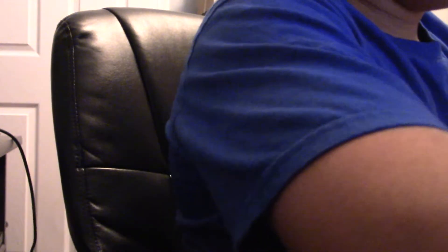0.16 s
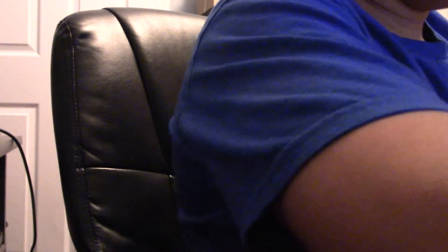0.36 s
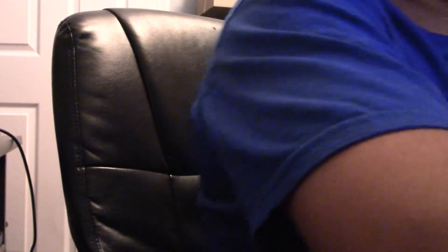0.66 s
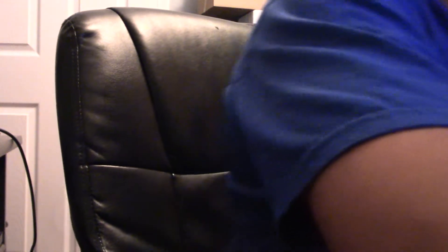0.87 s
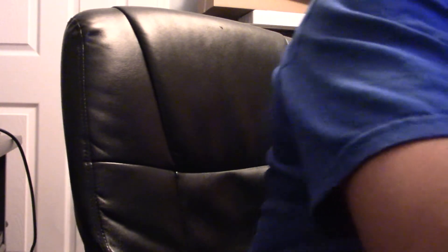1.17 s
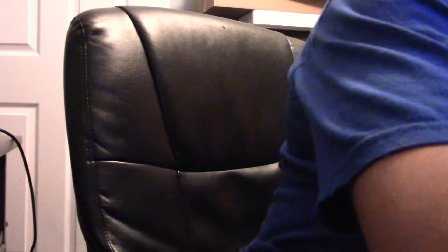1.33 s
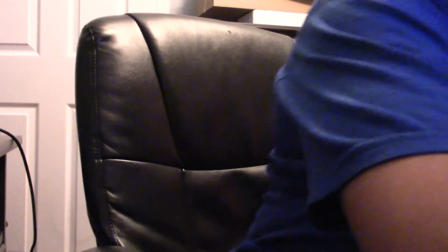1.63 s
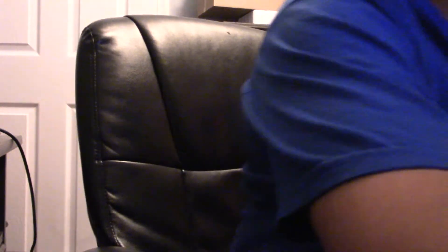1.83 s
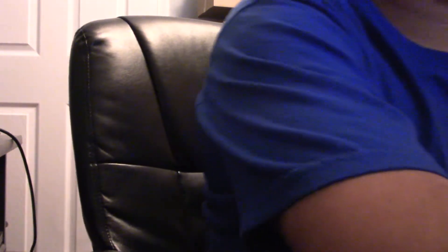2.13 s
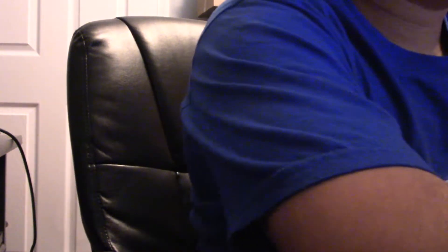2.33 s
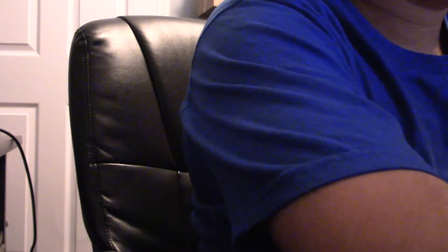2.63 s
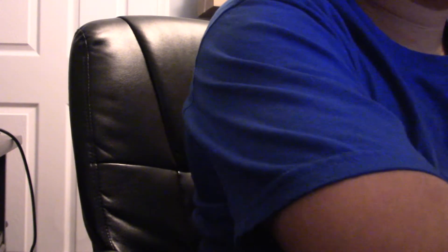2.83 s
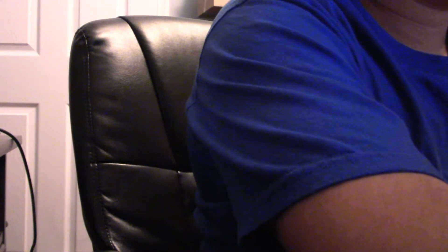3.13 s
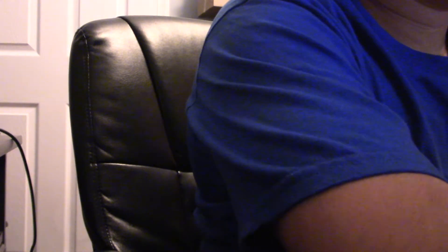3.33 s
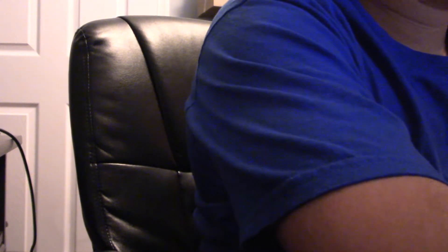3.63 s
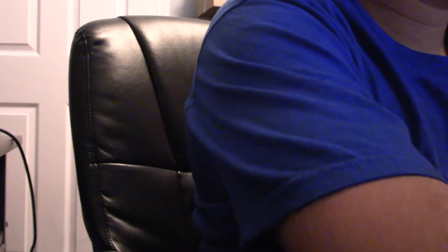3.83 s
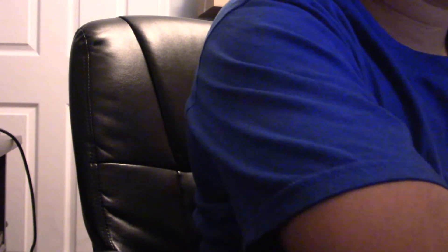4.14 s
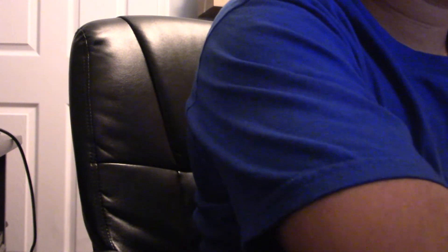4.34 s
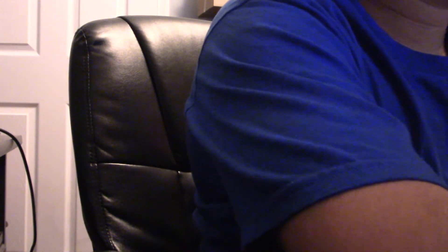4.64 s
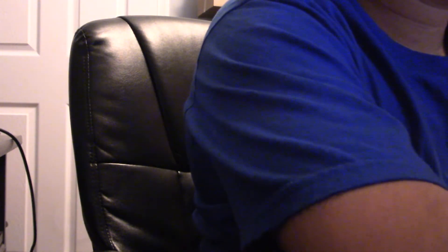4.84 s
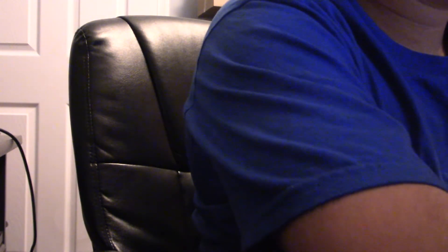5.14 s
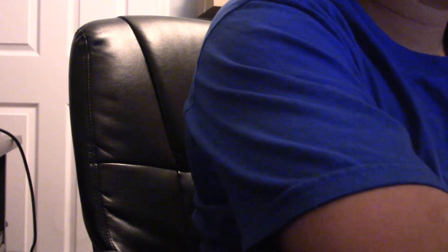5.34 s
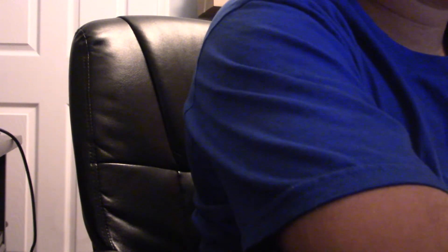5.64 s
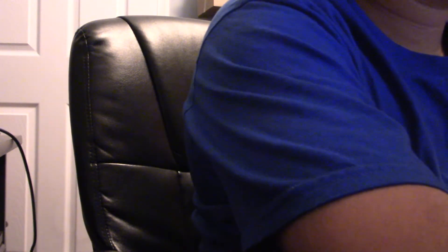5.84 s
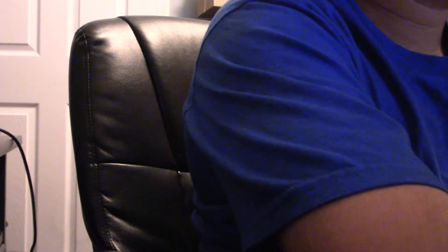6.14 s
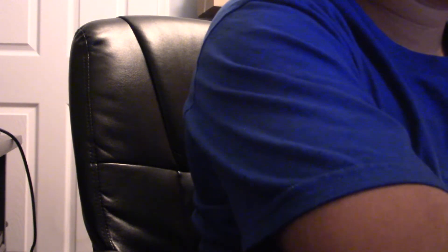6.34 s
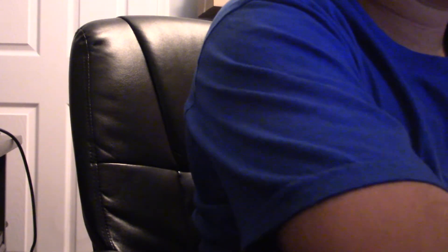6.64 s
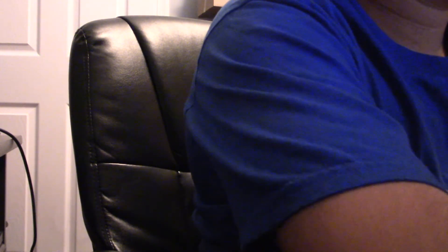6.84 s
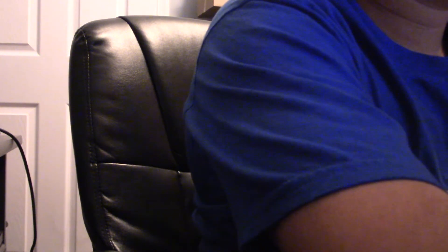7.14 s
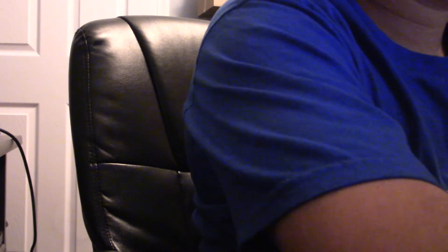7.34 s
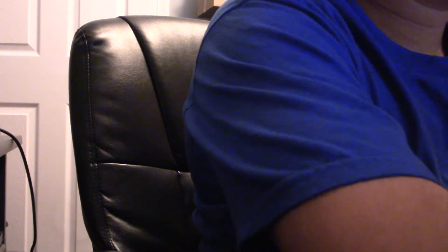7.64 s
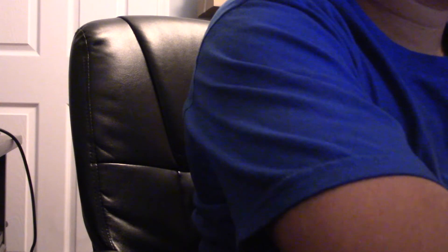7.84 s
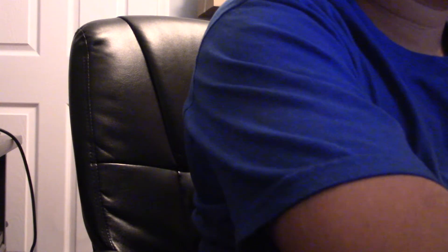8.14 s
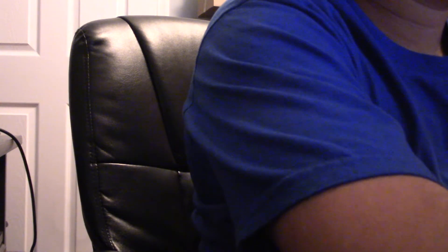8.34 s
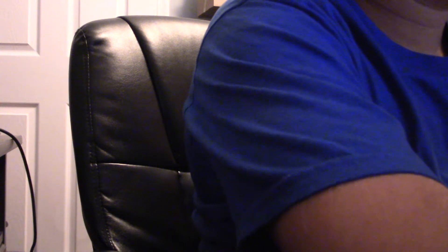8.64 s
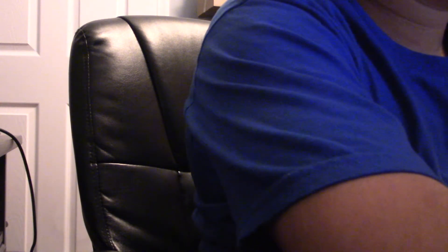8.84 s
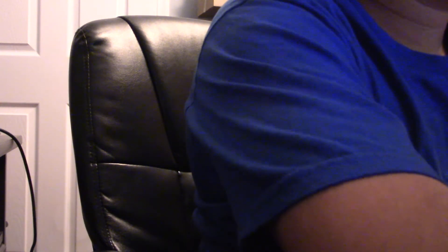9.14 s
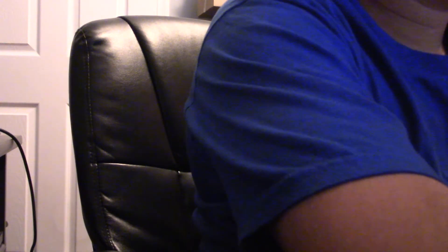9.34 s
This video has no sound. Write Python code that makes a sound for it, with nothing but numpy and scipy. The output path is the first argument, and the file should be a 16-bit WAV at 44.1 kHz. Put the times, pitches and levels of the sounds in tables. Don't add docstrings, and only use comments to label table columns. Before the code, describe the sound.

Clicky mechanical keyboard typed in slow, irregular bursts, with deeper space-bar clacks, over a soft steady computer fan hum in a small room.

```python
import sys
import numpy as np
from scipy import signal
from scipy.fft import rfft, irfft, next_fast_len
from scipy.io import wavfile
from scipy.ndimage import uniform_filter1d

SR = 44100
rng = np.random.default_rng(int(sys.argv[2]) if len(sys.argv) > 2 else 0)


def volts(x):
    e = np.asarray(x, float) / 20
    return 10 ** e


def wav_record(signal):
    frames = np.transpose(np.atleast_2d(signal))
    bounded = np.clip(frames, -1, 1)
    quanta = np.round(bounded * 32767).astype(np.int16)
    wavfile.write(sys.argv[1], SR, quanta)


N = 418509
LEAD = 264
CLICK_HZ, JAR_HZ = 8700, 7200


def evened(x):
    return x / np.sqrt(np.mean(x ** 2) + 1e-20)


def peaked(x):
    return x / (abs(x).max() + 1e-20)


def colour(x, points, share=1):
    size = next_fast_len(x.shape[-1])
    f, db = np.transpose(points)
    bins = np.fft.rfftfreq(size, 1 / SR)
    shape_db = np.interp(np.log(bins + 1), np.log(f + 1), db)
    return irfft(rfft(x, size) * volts(share * shape_db), size)[..., :x.shape[-1]]


def add(mix, s, sound):
    part = mix[round(s * SR):][:len(sound)]
    part += sound[:len(part)]


# (frequency [Hz], density [dB per Hz])
AIR_COLOUR = [(18, -53), (30, -22), (124, -11.5), (199, -12.5), (233, -5.5), (426, -14.5), (461, -10),
              (866, -18), (962, -17), (1070, -25.5), (1670, -25.5), (2170, -26), (3310, -27), (16000, -42)]
# (frequency [Hz], level [dB])
AIR_SPREAD = [(60, -12), (180, -14.5), (550, -10.5), (1650, -4.5), (4970, -10.5), (15000, -11.5)]
WHISTLE_HZ = [237, 991, 1360, 1680, 3360, 6170]
# (width [Hz], level [dB])
WHISTLES = [(40.8, -63.5), (74.074, -65), (80, -68), (65, -70), (45, -76.5), (130, -81.5)]


def air():
    mid, side = colour(rng.standard_normal((2, N)), AIR_COLOUR)
    scale = volts(-57.5) / mid.std()
    mid, side = scale * mid, scale * colour(side, AIR_SPREAD)
    t = np.arange(N) / SR
    for hz, (width, db) in zip(WHISTLE_HZ, WHISTLES):
        waver = signal.lfilter([1], [1, -np.exp(-np.pi * width / SR)], rng.standard_normal((2, N)))
        whistle = ((waver[0] + 1j * waver[1]) * np.exp(2j * np.pi * hz * t)).real
        mid = mid + volts(db) * evened(whistle)
    return mid, side


def ring(modes, spread_db, detune, damping, size=2560):
    t = np.arange(size)[:, None] / SR
    hz, db, t60 = np.transpose(modes)
    strength, shift = rng.uniform(-1, 1, (2, len(hz)))
    fade_db = db + spread_db * strength - 60 * t / (damping * t60)
    sines = np.sin(2 * np.pi * hz * (1 + detune * shift) * t)
    return peaked((volts(fade_db) * sines).sum(1))


def rattle(ms, density):
    early = np.arange(1400) - LEAD
    t = np.maximum(early, 0) / SR / (ms / 1000 + 1e-4)
    slide = 0.09 * np.exp(early / 90)
    swell = np.where(early < 0, slide, np.minimum(0.16 + 1.9 * t, 1) * np.exp(-t ** 0.68))
    chatter = rng.standard_normal(1400) * (rng.random(1400) < density) * swell
    chatter[np.argmax(t > 0.4)] = 0.84
    return chatter


def pulse(points, hz, lift_db, octaves):
    f = abs(np.fft.fftfreq(1024, 1 / SR)) + 1
    at, db = np.transpose(points)
    hump_db = lift_db * np.exp(-(np.log2(f / hz) / octaves) ** 2)
    shape_db = np.interp(np.log(f), np.log(at), db) + hump_db
    spectrum = np.exp(np.conj(signal.hilbert(np.log(volts(shape_db)))))
    return np.fft.ifft(spectrum).real[:512]


def radiate(click, contact, rung, even):
    struck = np.pad(peaked(click), (0, len(rung) - len(click))) + rung
    z = rfft(contact, 4096) * rfft(struck, 4096)
    near = irfft(z)
    smooth = uniform_filter1d(abs(z), size=5) + 1e-9
    sent = irfft(z * (abs(rfft(click, 4096)) / smooth) ** even)
    sent *= np.exp(-np.maximum(np.arange(4096) - LEAD, 0) / 320)
    sent *= np.linalg.norm(near) / np.linalg.norm(sent)
    return np.array([near, sent]) / abs(near).max()


# (frequency [Hz], level [dB], t60 [s])
CASE_MODES = [(786, 17.5, 0.029), (884, 1.5, 0.059), (1180, 20, 0.011), (1240, -51, 0.043),
              (1770, -45.5, 0.11), (2390, 4.5, 0.06), (2760, -2, 0.0295), (2600, -3, 0.038)]
# (frequency [Hz], level [dB], t60 [s])
DESK_MODES = [(190, -9, 0.17), (233, -9, 0.019), (306.2, 8, 0.093), (378, 5.5, 0.016), (432, -2, 0.19),
              (504, 11.5, 0.049)]
# (frequency [Hz], level [dB])
PLASTIC_COLOUR = [(150, -62), (400, -5), (700, -3), (1200, -1), (2000, -3), (2900, -14), (4000, -21),
                  (16000, -60.5)]
# (frequency [Hz], level [dB])
EDGE_COLOUR = [(1000, -53.5), (2500, 2), (3600, 3), (5000, -3), (7000, -5.5), (15000, -24.5)]


def knock(db, hz, thud_db, edge_db, ms):
    cap = (hz, 4.5, 0.03)
    rung = volts(-7) * ring(CASE_MODES + [cap], 6, 0.03, 0.65)
    plastic = np.array(PLASTIC_COLOUR) * [(hz / 1400) ** 0.22, 1]
    body = radiate(pulse(plastic, hz, 6.4, 0.19), rattle(ms, 0.18), rung, 0.87)
    edge = radiate(pulse(EDGE_COLOUR, 6720, 1, 0.37), rattle(ms, 0.36), np.zeros(512), 1)
    push = signal.windows.hann(90)
    thud = peaked(np.convolve(ring(DESK_MODES, 1.4, 0.1, 0.56, size=3584), push))
    out = body + volts(edge_db + 1) * edge
    out[:, LEAD + 88:][:, :len(thud)] += volts(thud_db + 2) * thud
    return volts(db + 3) * out


# (frequency [Hz], level [dB], t60 [s])
SPRING_MODES = [(6850, -26, 0.0088), (8070, 1, 0.015), (8940, -43, 0.0098), (10720, 9, 0.068),
                (13000, -1, 0.005)]
# (frequency [Hz], level [dB])
STEEL_COLOUR = [(1000, -86), (4000, 4), (6500, 3.5), (9000, 7), (12500, 9.5), (14500, -5), (17000, -79)]


def snap(db, hz):
    leaf = ring(SPRING_MODES + [(hz, 0, 0.03)], 5.4, 0.22, 0.1)
    ping = volts(-10.5) * np.convolve(leaf, [1, -1])
    return volts(db + 1) * radiate(pulse(STEEL_COLOUR, hz, 5.3, 0.6), rattle(1.1, 0.54), ping, 0.28)


# (time [s], blow [dB], cap
# ring [Hz], desk thud [dB])
BRUSHES = [(0.001, -33, 1080, -9.5), (0.087, -32, 720, -4), (0.35, -22, 1180, -13), (1.225, -24, 1400, -9),
           (1.233, -26, 1820, -9.5), (1.248, -25, 2000, -26), (1.574, -25.5, 980, -10.5),
           (1.584, -25.5, 1010, -23), (4.331, -38.5, 715, -14), (3.331, -38.5, 1730, -16),
           (3.562, -31, 2220, -24), (3.576, -36.5, 673, -7), (3.802, -24.5, 1690, -15),
           (3.804, -19, 650, -26), (4.3922, -32.5, 1560, -28), (4.6954, -43, 1620, -20),
           (4.8834, -35.5, 1790, -29), (4.888, -44, 1820, -23), (5.157, -47.5, 1350, -16),
           (6.321, -50, 1410, -17), (6.485, -32.5, 690, -12.5), (7.048, -41, 1360, -13),
           (7.518, -51, 1630, -1), (7.996, -32, 910, -6.5), (8.052, -33.5, 1180, -14),
           (8.931, -56, 1020, -7), (8.987, -47, 2660, -15), (9.248, -24.5, 1100, -8.5),
           (9.361, -26.5, 1170, -30)]
# (time [s], snap [dB], ring [Hz])
TWANGS = [(0.0014, -39.5, 7210), (0.3538, -29, 10300), (0.423, -37, 11100), (3.245, -51, 8300),
          (3.768, -30, 12000), (3.803, -38, 7970), (6.4574, -50, 9500), (6.599, -34.5, 8950),
          (6.955, -44, 8100), (7.9744, -46, 7360), (8.0666, -45, 6730), (8.1866, -48, 7700),
          (9.347, -46, 6660)]


def brushes():
    edge_db, rattle_ms = -19, 2.4
    return [(*row, edge_db, rattle_ms) for row in BRUSHES], list(TWANGS)


# (time of touch [s], touch [dB], cap ring [Hz], click delay [ms], landing [dB])
PRESSES = [(0.072, -23, 2040, 5.5, -30), (0.3266, -25, 1790, 13.7, -32), (1.3723, -16.5, 2600, 11, -37),
           (2.825, -21.5, 1830, 4.9, -36), (3.2406, -34.5, 2230, 17.4, -27.5), (3.565, -25, 2140, 8.2, -41),
           (3.7394, -24, 1490, 14, -14.5), (4.33, -41, 2160, 15.6, -34.5), (5.5, -21, 2380, 2.9, -33.5),
           (6.4399, -37.5, 2200, 27.2, -33.5), (6.9406, -36.5, 2270, 23, -35), (7.789, -25, 1710, 9.5, -25),
           (7.979, -27, 2200, 2.6, -39), (9.036, -23, 1580, 5.7, -21), (9.2301, -21, 2070, 9.3, -45)]


def presses():
    touch, landing = (-23.5, -12.5, 2.9), (-20.5, -20.5, 2.5)
    travel_ms, click_db = 13, -25.5
    knocks, snaps = [], []
    for s, db, hz, click_ms, landing_db in PRESSES:
        landed = s + max(travel_ms, click_ms) / 1000
        knocks += [(s, db, hz, *touch), (landed, landing_db, hz, *landing)]
        snaps += [(s + click_ms / 1000, click_db, CLICK_HZ)]
    return knocks, snaps


# (time of top stop [s], blow [dB], cap ring [Hz], spring let go before [ms], bounce [dB])
RELEASES = [(0.156, -14, 1560, 9, -50), (0.426, -21, 1270, 13.5, -28), (1.459, -12.5, 1530, 12.5, -28),
            (2.917, -13.5, 1800, 8, -48), (3.3572, -34.5, 2180, 27, -45), (3.6629, -23, 1880, 6, -55),
            (3.864, -22.5, 1200, 9, -35), (4.448, -33.5, 2100, 24, -46), (5.5863, -9.5, 1700, 9, -23),
            (6.589, -30, 1910, -2.5, -34), (7.0751, -35, 2210, 24.5, -52), (7.883, -11.5, 1400, 8, -42),
            (8.096, -32.5, 745, 21.5, -43), (9.131, -20.5, 1680, 7.5, -30), (9.367, -26, 1310, 13, -38)]


def releases():
    unseat, top_stop, bounce = (-23, -13, 2.5), (-23.5, -18, 2.4), (-33, -21.5, 1.8)
    unseat_db, jar_db, bounce_ms = -17, -29.5, 10
    knocks, snaps = [], []
    for s, db, hz, early_ms, bounce_db in RELEASES:
        let_go = s - early_ms / 1000
        let_go_db = -42.5 + 0.37 * early_ms
        knocks += [(let_go, db + unseat_db, hz, *unseat), (s, db, hz, *top_stop)]
        knocks += [(s + bounce_ms / 1000, bounce_db, hz, *bounce)]
        snaps += [(let_go, let_go_db, 8100), (s, db + jar_db, JAR_HZ)]
    return knocks, snaps


# (time [s], level [dB])
RUBS = [
    [(0.45, -53), (0.55, -64.5), (0.814, -56), (1.006, -54.5), (1.306, -53), (1.612, -56.5), (1.7, -44)],
    [(1.8, -53), (1.846, -62), (1.936, -61.5), (2.19, -59), (2.5, -64.5)],
    [(5.25, -97), (5.5, -76)],
]
# (frequency [Hz], density [dB per Hz])
CLOTH_COLOUR = [(59, -31), (100, -12), (196, -2), (227, -3), (452, 2), (733, -1.5), (1880, -3),
                (7050, -21.5), (15000, -36)]


def rub():
    t = np.arange(N) / SR
    drag = sum(volts(np.interp(t, *np.transpose(rows), -120, -120)) for rows in RUBS)
    patchy = evened(uniform_filter1d(rng.standard_normal(N), 600))
    friction = evened(colour(rng.standard_normal(N), CLOTH_COLOUR))
    return uniform_filter1d(drag, 2000) * volts(0.96 * patchy + 3.64) * friction


# (time [s], blow [dB], ring [Hz], far end delay [ms])
BAR_DOWN = [
    (1.633, -22, 1190, 6.7),
    (5.736, -20.5, 1440, 5.2),
    (7.211, -24, 2360, 9),
    (8.189, -26, 3200, 10.2),
]


def bar_presses():
    fall, far_end = (-8.5, -1.5, 3.9), (-12, -1.5, 3.02)
    knocks, snaps = [], []
    for s, db, hz, ms in BAR_DOWN:
        knocks += [(s, db, hz, *fall), (s + (ms + 1.46) / 1000, db - 3, 1065, *far_end)]
        snaps += [(s, db - 7, 7300), (s + ms / 1000, -23, CLICK_HZ)]
    return knocks, snaps


# (time [s], blow [dB], ring [Hz])
BAR_UP = [
    (1.714, -6, 1230),
    (5.851, -13, 1280),
    (7.299, -14, 1270),
    (8.294, -12, 1130),
]


def bar_releases():
    rise = (-14, -10.5, 2.3)
    knocks = [(s, db, hz, *rise) for s, db, hz in BAR_UP]
    snaps = [(s, db - 19.5, JAR_HZ) for s, db, hz in BAR_UP]
    return knocks, snaps


def keyboard():
    out = np.zeros((N + LEAD, 2))
    for knocks, snaps in (brushes(), presses(), releases(), bar_presses(), bar_releases()):
        for s, db, hz, thud_db, edge_db, ms in knocks:
            hard_db = db + 17
            blow = knock(db, hz, thud_db, edge_db + 0.0062 * hard_db, ms * volts(0.22 * hard_db))
            add(out, s, blow.T)
        for s, db, hz in snaps:
            add(out, s, snap(db, hz).T)
    return signal.sosfilt(signal.butter(3, 150, "high", fs=SR, output="sos"), out[LEAD:].T)


# (frequency [Hz], t60 [s])
ROOM_DECAY = [(150, 0.21), (500, 0.27), (1500, 0.29), (4000, 0.32), (9000, 0.26), (15000, 0.29)]
# (delay [ms], level [dB])
WALLS = [(4.3, -18), (7.8, -12), (9.6, -13), (11.5, -9), (13.0, -9), (18.0, -12), (24.0, -13)]
# (frequency [Hz], level [dB])
SOFT_COLOUR = [(150, -0.5), (600, 2), (1200, -4), (2700, -5.5), (5000, -4.5), (12000, -2.5)]
# (frequency [Hz], level [dB])
ECHO_SPREAD = [(60, -24), (300, -25), (1000, -20), (2500, -16), (5000, -9), (10000, -8), (15000, -6)]


def room(x, tail_db):
    taps = rng.standard_normal((2, SR // 2)) * (rng.random((2, SR // 2)) < 0.15)
    hz, t, z = signal.stft(taps, SR, nperseg=128)
    f, t60 = np.transpose(ROOM_DECAY)
    decay = volts(-60 * t / np.interp(hz, f, t60)[:, None])
    tail = signal.istft(z * decay, SR, nperseg=128)[1]
    tail *= 1 - np.exp(-(np.arange(tail.shape[1]) / SR / 0.008) ** 2)
    tail *= volts(tail_db) / np.linalg.norm(tail[0])
    for ms, db in WALLS:
        at = round(ms * SR / 1000) + np.array([0, 30])
        tail[[0, 1], at] += volts(db) * rng.choice([-1, 1], 2)
    mid, side = signal.fftconvolve(colour(x, SOFT_COLOUR)[None], tail, axes=1)[:, :N]
    return mid, colour(side, ECHO_SPREAD)


# (frequency [Hz], left minus right [dB])
LEAN = [(200, 0), (1000, -.9), (2500, -1.4), (4500, -3), (15000, -2.5)]


def scene():
    hiss, hiss_side = air()
    near, sent = keyboard() + volts(-1.5) * rub()
    echo, side = room(sent, 0.16)
    left = colour(near + echo, LEAN, 1 / 2)
    right = colour(near + echo, LEAN, -1 / 2)
    return np.array([left + side + hiss + hiss_side, right - side + hiss - hiss_side])


def top_cut(x):
    return signal.sosfilt(signal.butter(12, 16470, fs=SR, output="sos"), x)


def record(dry):
    thin = signal.sosfilt(signal.butter(1, 40, "high", fs=SR, output="sos"), dry)
    low_pass = signal.firwin(255, 15600, window=("kaiser", 5), fs=SR)
    dull = signal.oaconvolve(thin, low_pass[None], "same")
    return top_cut(dull)


dry = scene()
out = record(dry)
wav_record(out)
```